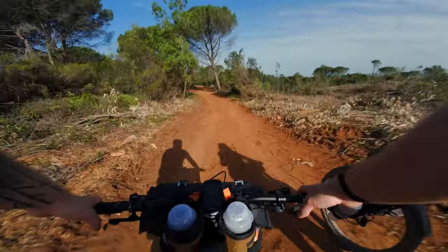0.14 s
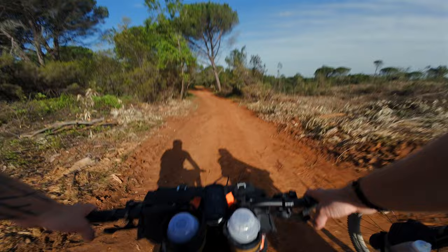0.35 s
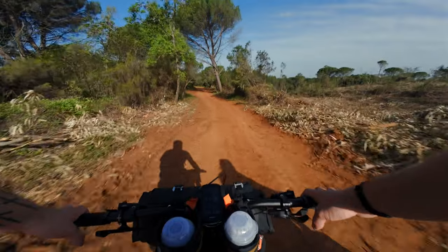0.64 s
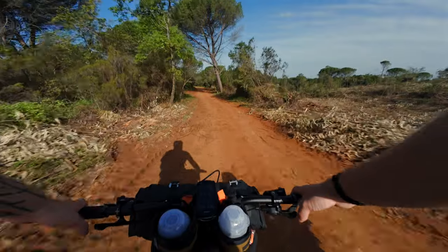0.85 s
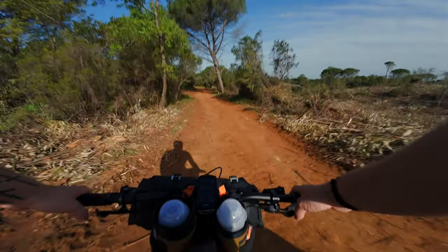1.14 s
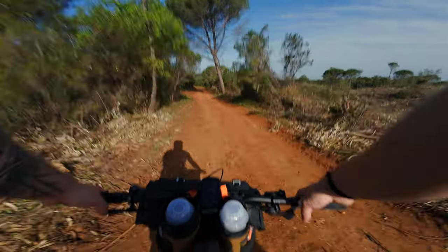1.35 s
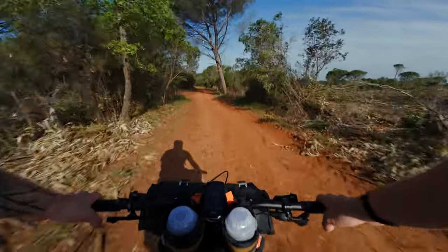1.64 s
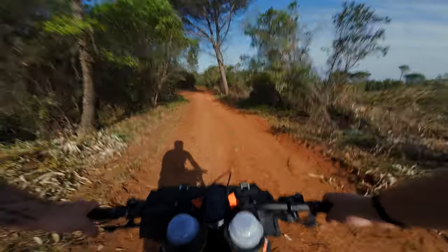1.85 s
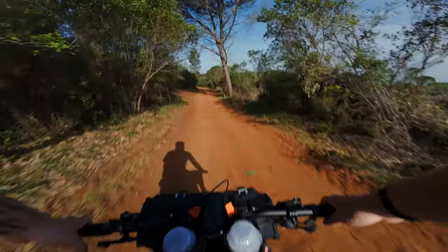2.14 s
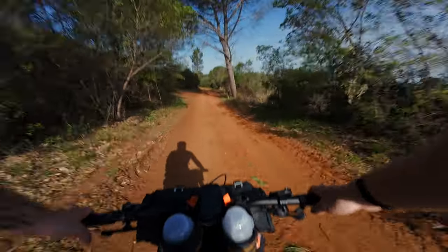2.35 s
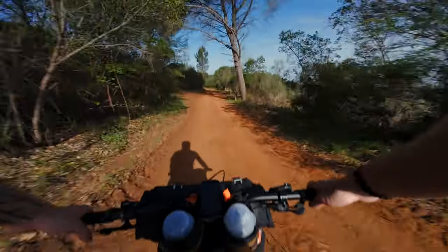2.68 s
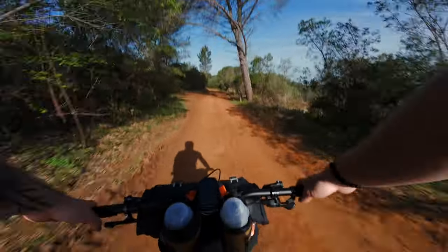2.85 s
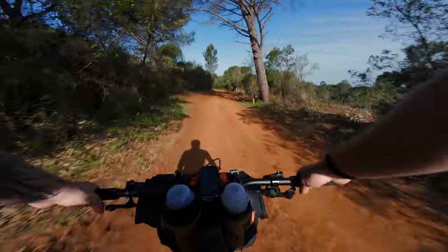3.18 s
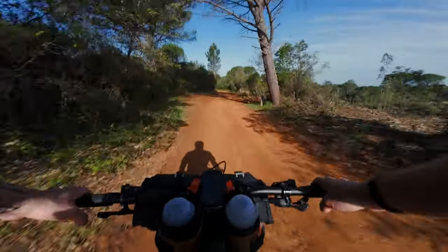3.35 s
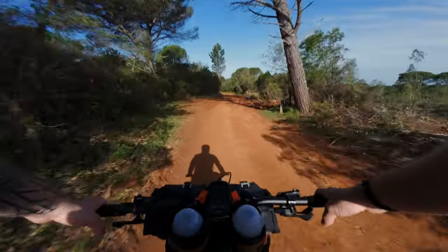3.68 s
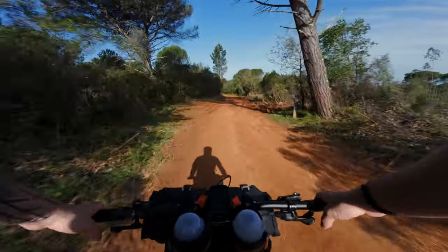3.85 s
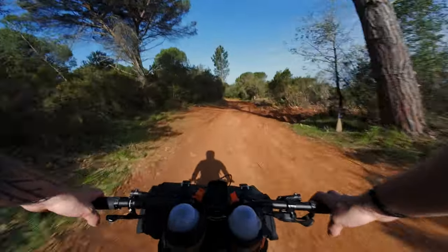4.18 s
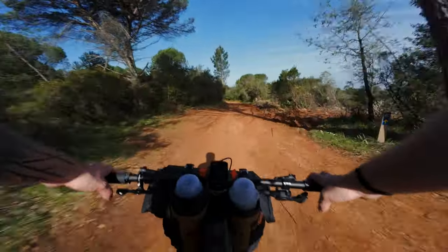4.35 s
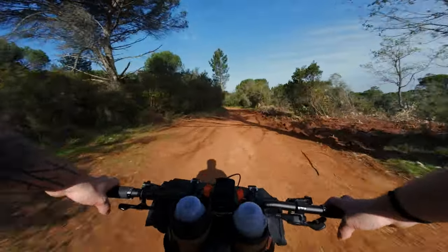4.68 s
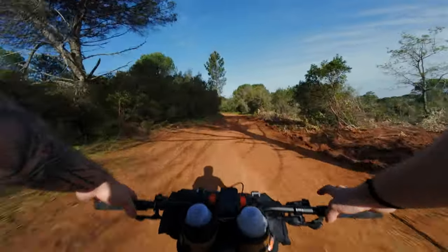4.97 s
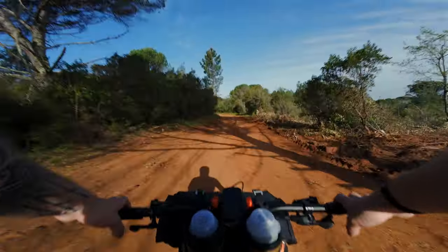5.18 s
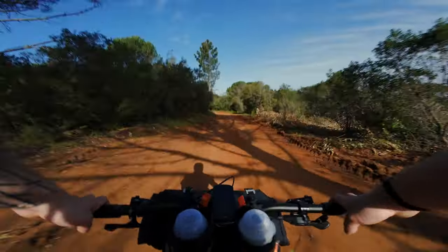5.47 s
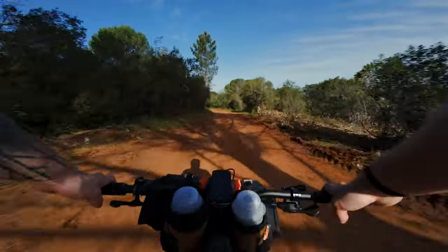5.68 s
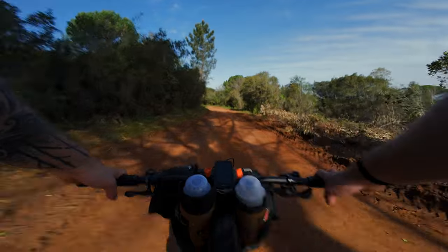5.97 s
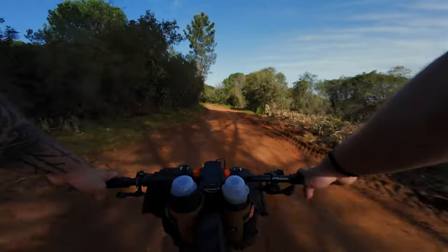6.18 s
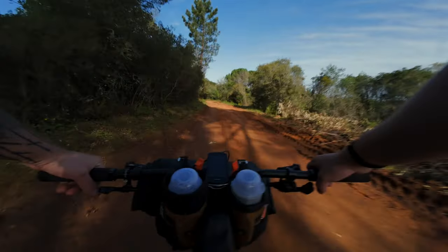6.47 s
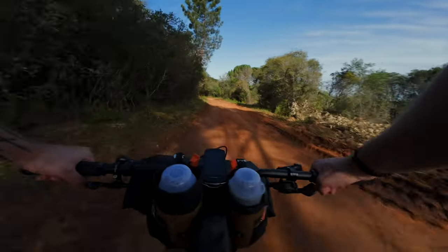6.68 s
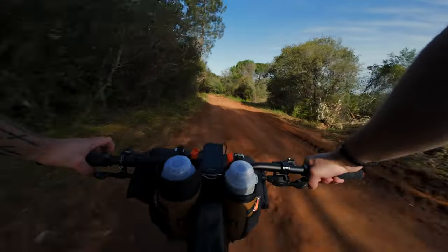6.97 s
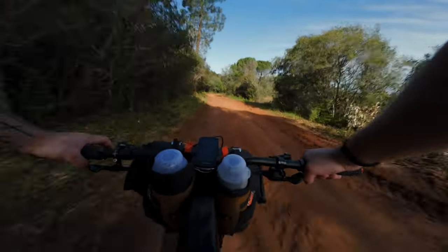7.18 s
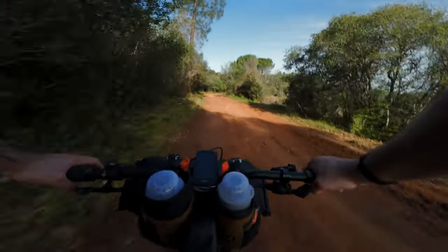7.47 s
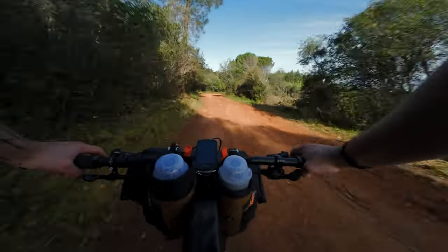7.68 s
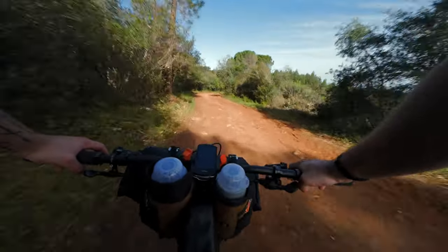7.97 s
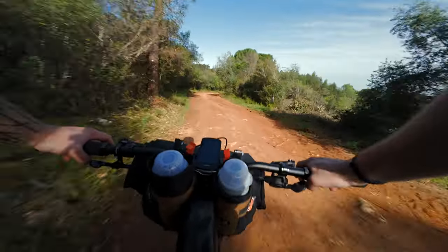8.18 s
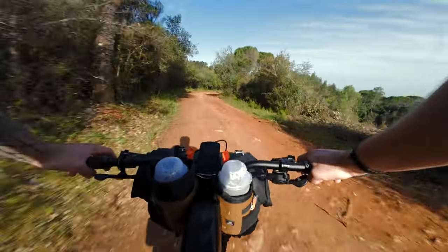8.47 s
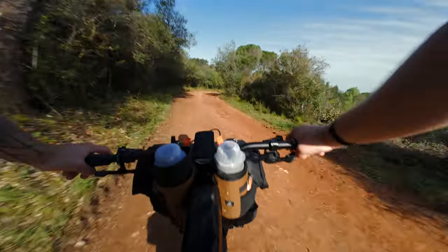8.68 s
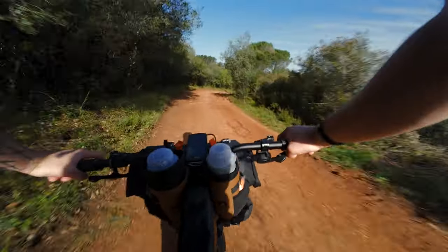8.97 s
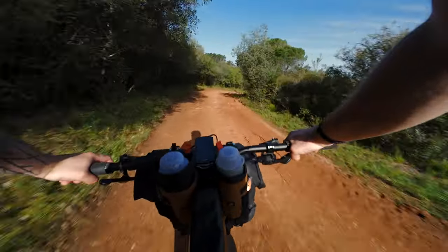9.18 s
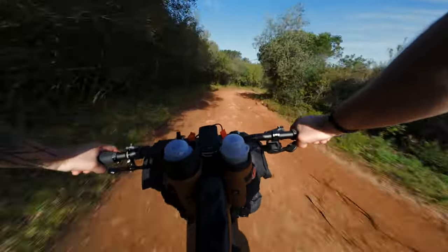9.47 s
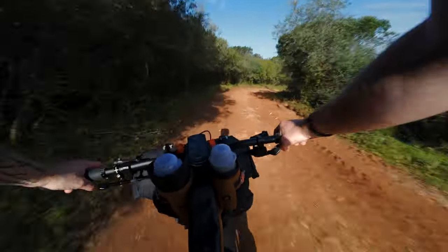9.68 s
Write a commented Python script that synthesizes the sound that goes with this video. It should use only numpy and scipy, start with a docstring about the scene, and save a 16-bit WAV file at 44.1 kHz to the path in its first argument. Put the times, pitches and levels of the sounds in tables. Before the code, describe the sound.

Continuous low drumming of bicycle tyres on an uneven earth track, heard from a chest-worn microphone in open air. Fine sizzle from a passed bicycle soon vanishes. Grit crackles, bags and bottles chatter, stones snap against the frame, and the load slams twice. Airstream flutters and thuds, with thin hiss above. In the second half the tyres scrub with a hollow rush and faint rasp.

```python
"""Loaded bicycle on a rough dirt track

Heard at the rider's chest through two microphone ports. Random impacts drive the resonances of tyres
and frame; streams of small cracks make grit and sand, and a dense rush the tyres scrubbing in a bend.
Damped rings make flung stones, knocks and the slamming load; shaped noise makes rattles and ticks.
Low noise and pressure pulses make the wind, bright noise its hiss; a second bicycle's sizzle fades behind."""
import sys
import numpy as np
from scipy import signal
from scipy.fft import rfft, irfft, next_fast_len
from scipy.io import wavfile
from scipy.ndimage import map_coordinates

SR = 44100
rng = np.random.default_rng(int(sys.argv[2]) if len(sys.argv) > 2 else 0)


def dump(signal):
    """Clip the signal to [-1, 1] and save it as 16-bit WAV at the path in sys.argv[1]."""
    limited = np.clip(np.atleast_2d(signal).T, -1, 1)
    pcm = np.round(limited * 32767).astype(np.int16)
    wavfile.write(sys.argv[1], SR, pcm)


N = 433503

# All levels are relative: a source may add its own trim, and the ports shape the right side.
# rumble of the uneven ground: t/s, level/dB
ROAD_LEVEL = [(0.0, -42), (0.6, -37), (2.96, -36), (3.31, -33.5), (3.7, -35.5), (4.71, -34), (5.15, -38.5),
              (5.5, -33.5), (7.36, -37), (8.1, -34), (8.38, -36), (9.83, -35.5)]
# lowest tyre resonance: t/s, level/dB
LOW_BOOM_LEVEL = [(0, -38), (.55, -34), (1.8, -37.5), (2.35, -33), (2.7, -30.5), (3.0, -36), (3.8, -38.5),
                  (4.15, -34), (4.6, -35), (4.9, -25), (5.1, -37), (5.95, -40), (6.7, -33.5), (7.55, -39.5),
                  (8.0, -30.5), (8.5, -35), (8.7, -35), (8.95, -34), (9.83, -35.5)]
# higher resonances of tyres and frame: t/s, level/dB
FRAME_BOOM_LEVEL = [(0, -38.5), (.7, -32), (1.6, -39), (2.3, -31.5), (3.6, -34), (4.6, -35), (5.0, -42),
                    (5.25, -29.5), (6.1, -33.5), (7.3, -31.5), (8.25, -31), (8.7, -32), (9.83, -32)]
# resonances of tyres and frame: f/Hz, width/Hz, level/dB
TYRE_MODES = [(208.7, 13.4, 0), (291.2, 17.7, 1.5), (334, 43, -17), (416, 16.6, -3.5)]
# shift of these resonances, upward as the bend loads the tyres: t/s, relative rise in pitch/1
TYRE_PITCH = [(0, -0.016), (2.3, -.015), (4.6, 0.0057), (7.3, .02), (9.83, 0.0078)]
# grit crunching under the tyres: t/s, level/dB
GRIT_LEVEL = [(0.0, -49), (0.63, -46), (1.04, -46), (3.09, -46), (3.2, -42), (3.5, -46.5), (4.76, -42.5),
              (5.17, -45.5), (5.72, -40.5), (6.13, -49.5), (6.63, -58), (7.06, -46), (8.27, -45),
              (8.79, -53), (9.42, -46.5), (9.83, -52.5)]
# pitch of the grit: t/s, relative rise/1
GRIT_PITCH = [(0, 0.032), (2.8, 0.00035), (3.25, -.02), (3.8, -0.034), (4.3, 0.063), (4.7, -.05),
              (5.15, .06), (5.8, -0.021), (9.83, 0.022)]
# tyres scrubbing through the bend: t/s, level/dB
SCRUB_LEVEL = [(5.3, -67), (5.8, -42.5), (6.55, -42.5), (7.0, -37), (7.47, -41), (7.82, -38.5), (8.63, -42),
               (9.06, -49), (9.83, -45)]
# thin rasp from the bend on: t/s, level/dB
RASP_LEVEL = [(5.5, -75), (5.9, -47), (6.5, -54), (7.4, -56), (8.4, -49), (9.1, -50.5), (9.83, -51)]

# stones flung at the bicycle: t/s, peak level/dB, ring f/Hz
STONES = [(0.8563, -20, 1840), (.859, -23, 2510), (1.015, -17.5, 2110), (1.566, -21, 1780),
          (2.164, -20, 1620), (2.21, -26, 2060), (2.332, -30, 1100), (2.342, -25, 2000), (3.041, -20, 2190),
          (3.0587, -22, 1690), (3.059, -26, 3400), (3.117, -23, 2020), (3.16, -23, 1800),
          (3.2205, -14.5, 1830), (3.234, -24, 1900), (3.687, -21, 1820), (4.2734, -20, 2272),
          (4.3286, -23, 2200), (5.056, -16, 2510), (5.061, -21, 1098), (5.062, -12, 2120),
          (5.301, -16, 1700), (5.464, -20, 1680), (5.5569, -8, 2220), (5.726, -16, 2230),
          (5.8327, -25, 3144), (5.833, -14.5, 1660), (8.5174, -8.5, 2120), (8.937, -18, 1948),
          (9.5715, -19, 2330)]
# hard knocks that reach the frame: t/s, level/dB, thud f/Hz
KNOCKS = [(1.206, -20.5, 377), (2.333, -17, 450), (3.606, -19, 288), (3.764, -22, 400), (4.743, -24, 408),
          (4.867, -21, 208), (5.821, -18, 730), (5.8335, -16, 500), (5.84, -20, 840), (5.847, -17.5, 420)]
# load slamming against its rack: t/s, contact peak/dB, ring peak/dB, share of the free ring time/1
CLACKS = [(2.2161, -5.5, -18, 0.48), (4.7284, -12, -2.5, 0.9), (4.731, -18, -10, .3)]
# free ringing of rack and load: f/Hz, level/dB, t60/s
RACK_MODES = [(210, -6, 0.06), (297.4, -2.5, 0.049), (410, -5, 0.048), (650, -15, 0.0084), (835, -3, 0.016),
              (1320, 2.5, 0.014), (1680, 0, 0.013)]
# jolts that shake the luggage: t/s, level/dB, t60/s
RATTLES = [(.855, -19.5, 0.056), (1.198, -22, 0.044), (1.565, -19.5, 0.039), (1.783, -26, 0.24),
           (2.163, -19.5, 0.1), (2.321, -19, 0.15), (3.058, -18.5, 0.11), (3.14, -20, .1),
           (3.158, -19, 0.18), (3.21, -30, 1.0), (3.3, -31.5, 0.47), (3.601, -16, 0.077),
           (3.759, -18.5, 0.23), (4.271, -28, 0.89), (4.733, -23.5, 0.23), (5.296, -24, 0.066),
           (5.625, -21, 0.066), (5.82, -23, 0.11), (5.843, -24, 0.063), (6.058, -26, 0.066),
           (8.842, -20.5, 0.036), (8.975, -21, 0.05), (9.024, -19.5, 0.045), (9.222, -23, .05)]
# sharp metal ticks of chain and buckles: t/s, level/dB
TICKS = [(.174, -17.5), (3.161, -24), (3.2166, -18), (3.5637, -20.5), (5.5363, -23), (5.777, -20.5),
         (5.994, -18.5), (7.093, -18)]

# low buffeting of the airstream: t/s, level/dB
WIND_LEVEL = [(0.0, -33), (0.35, -32), (1.23, -30.5), (2.1, -28.5), (2.5, -28.5), (3.3, -28.5), (4.76, -35),
              (5.5, -25.5), (5.7, -23.5), (6.07, -28), (7.42, -28), (7.66, -31), (8.16, -22.5),
              (8.45, -26.5), (8.7, -27), (9.0, -27), (9.83, -27.5)]
# separate puffs of wind: t/s, level over the steady buffeting/dB
GUSTS = [(.2, 10), (.42, 11), (.71, 8), (1.47, 10), (2.12, 7), (2.27, 7.5), (4.0, 4.5), (4.28, 6),
         (6.53, 5.5), (7.31, 8), (7.46, 4), (8.99, 1.5), (9.63, 4)]
# eddies thumping on the microphone: t/s, peak level/dB, rise time constant/s
EDDIES = [(.386, -10.5, .0015), (1.402, -9, 0.0013), (1.494, -9, 0.0012), (1.565, -12, .0015),
          (1.889, -8.5, 0.00052), (1.966, -7.5, 0.00053), (2.072, -8, 0.0005), (2.148, -7.5, .0007),
          (2.241, -7, 0.0012), (2.304, -9, 0.00047), (2.379, -10, 0.0016), (2.448, -12.5, 0.00039),
          (2.526, -7, .0012), (2.606, -8, 0.00057), (2.694, -11, .0012), (2.761, -8, 0.00044),
          (2.837, -12, 0.0021), (2.914, -11, 0.00037), (3.081, -11, .0008), (3.16, -8.5, 0.0029),
          (3.263, -10, 0.0013), (3.358, -10, 0.0015), (3.426, -10.5, .0006), (3.525, -13, 0.002),
          (5.64, -14, .003), (5.751, -10, 0.0037), (6.864, -8.5, 0.0021), (6.94, -13, 0.002),
          (7.926, -10, 0.0043), (8.02, -11, 0.003), (8.157, -11, .004), (8.205, -6, .004),
          (8.354, -4, 0.0031)]
# hiss of the airstream: t/s, level/dB
HISS_LEVEL = [(0.0, -43), (0.76, -50.5), (2.16, -50.5), (3.34, -50), (5.2, -52.5), (5.91, -44.5),
              (6.21, -50), (6.79, -47), (7.06, -45.5), (7.56, -47.5), (8.16, -45.5), (8.65, -46),
              (8.84, -50.5), (9.83, -47.5)]

# spectrum of the road rumble: f/Hz, level per Hz/dB
ROAD_COLOUR = [(50, -5), (130, -4.5), (180, 0.5), (240, -0.5), (330, 1.5), (450, 0), (550, -2.5),
               (640, -10), (850, -10), (1300, -27), (2000, -17), (4000, -33)]
# spectrum of the grit: f/Hz, level per Hz/dB
GRIT_COLOUR = [(400, -10), (800, -4.5), (1120, 1.5), (1350, -5.5), (1750, 2), (2300, -2), (2750, -2.5),
               (3200, -13.5), (4000, -19), (6000, -50)]
# spectrum of the finer grains: f/Hz, level per Hz/dB
SAND_COLOUR = [(1500, -31), (2900, -2.5), (3600, -1), (4100, -6.5), (4900, 1.5), (5600, -17), (7000, -25),
               (15000, -36)]
# spectrum of the scrub: f/Hz, level per Hz/dB
SCRUB_COLOUR = [(400, -46), (700, -1.5), (1000, 3.5), (1190, 0.5), (1390, 7.5), (1650, 1), (2050, 5.5),
                (2500, -6.5), (3200, -14), (4300, -21), (8000, -37)]
# spectrum of the rasp: f/Hz, level per Hz/dB
RASP_COLOUR = [(2000, -23), (3100, -10), (3700, 7), (4050, -6), (4400, -32), (8000, -35)]
# spectrum of the shaken luggage: f/Hz, level per Hz/dB
RATTLE_COLOUR = [(150, 4), (400, 15), (1200, 1), (1900, 8.5), (3000, -3.5), (4000, -3.5), (5500, -11.5),
                 (9000, -19), (15000, -42)]
# spectrum of the metal ticks: f/Hz, level per Hz/dB
TICK_COLOUR = [(1500, -16), (4000, -4.5), (7000, -10.5), (9500, -4.5), (11700, 1.5), (13500, -14),
               (16000, -10.5)]
# spectrum of the buffeting: f/Hz, level per Hz/dB
WIND_COLOUR = [(14, -3), (27, 2), (50, -6), (70, -7), (100, -17.5), (150, -20), (300, -33.5), (800, -57.5)]
# spectrum of the air hiss: f/Hz, level per Hz/dB
AIR_COLOUR = [(3000, -5.5), (5000, -10), (6800, -14), (8300, -6), (9000, -5.5), (10200, 4), (10900, -3.5),
              (12400, -1), (13000, -2), (13800, -7), (15600, -8)]
# spectrum of the second bicycle: f/Hz, level per Hz/dB
COMPANION_COLOUR = [(500, 4.5), (2500, 3), (3300, 0.5), (5000, -1), (6800, -9), (7600, -5), (8200, 3),
                    (9000, -5), (10000, -4), (12000, -3), (13000, -3), (15500, -11)]

# likeness of diffuse sound at the two ports: f/Hz, correlation/1
ALIKE = [(1400, 1), (3000, 0.71), (5000, 0.62), (9000, 0.11), (15000, .1)]
# response of the right port: f/Hz, level/dB
RIGHT_PORT = [(1150, 0), (1700, 2), (2400, 3), (3400, 3.5), (5000, 0.5), (6900, -10), (8500, -12),
              (10200, -19.5), (11800, -33), (15000, -22)]
# phase by which the left port leads: f/Hz, phase/rad
LEAD = [(30, 0.0008), (130, 0.0027), (300, 0.0037), (600, 0.012), (1200, 0.033), (2150, 0.6), (3400, 1.13),
        (4300, 2.4), (7700, 4.2), (15000, 6.7)]


def amp(db):
    """Level definition: twenty decibels are a factor of ten in amplitude."""
    return 10 ** (np.asarray(db) / 20)


def unit(x):
    """Power normalisation: the signal is scaled to rms 1."""
    return x / np.sqrt(np.mean(x ** 2) + 1e-20)


def along(points, hz):
    """Logarithmic pitch scale: (f, value) points are interpolated over log frequency."""
    f, v = np.transpose(points)
    return np.interp(np.log(hz + 1), np.log(f + 1), v)


def curves(rows):
    """Linear interpolation in time: one value per sample for each column after t."""
    s, *cols = np.transpose(rows)
    return [np.interp(np.arange(N) / SR, s, c) for c in cols]


def wobble(rate):
    """Slow random modulation: a smooth curve through normal knots, rate of them a second."""
    knots = rng.standard_normal(int(N * rate / SR) + 4)
    return map_coordinates(knots, [np.arange(N) * rate / SR])


def filtered(x, response):
    """Linear filtering: the spectrum is multiplied by a complex response of frequency."""
    m = next_fast_len(N + 8192)
    return irfft(rfft(x, m) * response(np.fft.rfftfreq(m, 1 / SR)), m)[..., :N]


def coloured(x, spectrum):
    """Spectral shaping at constant power: white noise keeps its power."""
    return filtered(x, lambda hz: unit(amp(along(spectrum, hz))))


def spread(pair):
    """Partial coherence: unrelated signals become left and right, alike at low frequencies only."""
    def shares(hz):
        turn = np.arccos(np.clip(along(ALIKE, hz), -1, 1)) / 2
        return np.array([np.cos(turn), np.sin(turn)])
    mid, side = filtered(pair, shares)
    return np.array([mid + side, mid - side])


def grains(rate, scatter_db):
    """Random impact process: two streams of tiny impacts of uneven size and sign, jointly rms 1."""
    struck = rng.random((2, N)) < rate / SR
    size = amp(scatter_db * np.clip(rng.standard_normal((2, N)), -2, 2))
    return unit(struck * size * rng.choice([-1, 1], (2, N)))


def add(track, s, sound):
    """Superposition: a short sound is added to a track from time s."""
    start = max(round(s * SR), 0)
    part = track[..., start:start + sound.shape[-1]]
    part += sound[..., :part.shape[-1]]


def drumming(boom_db=0.5, frame_db=-2, road_db=4.0, bump_db=1.5, sway_db=0.7, waver=.015):
    """Forced resonance: ground impacts drive tyres and frame, whose modes swell and shift with the load."""
    (level_db,), (stretch,) = curves(ROAD_LEVEL), curves(TYRE_PITCH)
    (tyre_db,), (shake_db,) = curves(LOW_BOOM_LEVEL), curves(FRAME_BOOM_LEVEL)
    bumps = amp(bump_db * wobble(30))
    booms = []
    for hz, width, db in TYRE_MODES:
        impacts = bumps * grains(rate=300, scatter_db=2.0)[0]
        ring = filtered(impacts, lambda f: 1j * f * width / (hz * hz - f * f + 1j * f * width))
        clock = np.cumsum(1 + stretch + waver * wobble(5))  # reading faster raises the pitch
        shifted = map_coordinates(ring, [clock], order=1, mode="mirror")
        booms.append(amp(db + sway_db * wobble(7)) * shifted)
    low_boom = amp(tyre_db + boom_db) * unit(booms[0])
    frame_boom = amp(shake_db + frame_db) * unit(sum(booms[1:]))
    rumble = coloured(grains(rate=900, scatter_db=1.5)[0], ROAD_COLOUR)
    return low_boom + frame_boom + amp(level_db + road_db) * bumps * rumble


def crunch(level_db, grit_db=4.5, sand_db=-7, clump_db=2.5, sweep_db=1.2, waver=.03):
    """Granular fracture: grit and sand crack in quick clumps within patches, the grit shifting in pitch."""
    stretch, = curves(GRIT_PITCH)
    clock = np.cumsum(1 + stretch + waver * wobble(11))
    cracks = coloured(grains(rate=850, scatter_db=2.0), GRIT_COLOUR)
    grit = np.array([map_coordinates(stream, [clock], order=3, mode="mirror") for stream in cracks])
    sand = coloured(grains(rate=1200, scatter_db=4.0), SAND_COLOUR)
    patches = amp(level_db + sweep_db * wobble(16))
    grit_gain = amp(grit_db + clump_db * wobble(90))
    sand_gain = amp(sand_db + clump_db * wobble(90))
    return patches * (grit_gain * grit + sand_gain * sand)


def scrub(scrub_db=5.5, flutter_db=1.8, onset_s=0.27, slip_s=7.27, slip_gain_db=4.5, slip_width_s=0.035):
    """Sliding friction: in the bend the tread slides a little, with one harder slip, in a hollow rush."""
    level_db, = curves(SCRUB_LEVEL)
    t = np.arange(N) / SR
    turning = np.clip((t - SCRUB_LEVEL[0][0]) / onset_s, 0, 1)
    slip_db = slip_gain_db * np.exp(-((t - slip_s) / slip_width_s) ** 2 / 2)
    rush = coloured(grains(rate=3000, scatter_db=3.0)[0], SCRUB_COLOUR)
    return turning * amp(level_db + slip_db + scrub_db + flutter_db * wobble(18)) * rush


def rasp(flutter_db=2.5):
    """Band-shaped random impacts: a thin, fine rasp sets in at the bend and stays."""
    level_db, = curves(RASP_LEVEL)
    scrape = coloured(grains(rate=2500, scatter_db=2.5), RASP_COLOUR)
    return amp(level_db + flutter_db * wobble(25)) * scrape


def ping(hz, t60, attack=0.00016, crack=0.26, crack_t60=0.0089, reach=1.41):
    """Damped impact response: one ring and a short dull crack, with little above the ring; peak 1."""
    t = np.arange(SR // 20) / SR
    ring = np.sin(2 * np.pi * hz * t) * amp(-60 * t / t60)
    band = signal.butter(3, [0.42 * hz, min(1.4 * hz, SR / 4)], "band", fs=SR, output="sos")
    snap = unit(signal.sosfilt(band, rng.standard_normal(len(t)))) * amp(-60 * t / crack_t60)
    contact = signal.butter(4, min(reach * hz, SR / 4), fs=SR, output="sos")
    blow = signal.sosfilt(contact, (ring + crack * snap) * (1 - np.exp(-t / attack)))
    return blow / np.abs(blow).max()


def stones(grit_db, pebble_db=12, scatter_db=0.5, pebble_hz=2100, pebble_t60=0.018, count=260):
    """Impact excitation: a few stones strike hard; many pebbles pop as loudly as the grit is coarse."""
    out = np.zeros(N)
    for s, db, hz in STONES:
        t60 = 0.0089 * hz / 2200  # s; lower blows are deader in proportion
        add(out, s, amp(db) * ping(hz, t60))
    moments = rng.integers(N, size=count)
    scatter = np.clip(rng.standard_normal((count, 2)), -2, 2)
    for at, (size, pitch) in zip(moments, scatter):
        pop = ping(pebble_hz * np.exp(.17 * pitch), pebble_t60)
        add(out, at / SR, amp(grit_db[at] + pebble_db + scatter_db * size) * pop)
    return out


def knocks(t60=0.013, overtone=2.46, overtone_db=-3, ring_db=-1, reach_hz=50):
    """Modal excitation: a blow thuds with one overtone and rings the tyre and frame modes near its pitch."""
    out, t = np.zeros(N), np.arange(SR // 4) / SR
    for s, db, thud_hz in KNOCKS:
        phase = 2 * np.pi * thud_hz * t
        thud = amp(-60 * t / t60) * (np.sin(phase) - amp(overtone_db) * np.sin(overtone * phase))
        ring = np.zeros(len(t))
        for hz, width, mode_db in TYRE_MODES:
            nearness = 1 / (1 + ((hz - thud_hz) / reach_hz) ** 2)
            ring += amp(mode_db) * nearness * np.exp(-np.pi * width * t) * np.sin(2 * np.pi * hz * t)
        add(out, s, amp(db) * (thud + amp(ring_db) * ring))
    return out


def clacks(low_hz=380, contact_hz=2050, build_cycles=0.4):
    """Contact damping: the load slams its rack; the hollow ring is choked while the parts stay pressed."""
    out, t = np.zeros(N), np.arange(SR // 8) / SR
    soften = signal.butter(10, min(contact_hz, SR / 4), fs=SR, output="sos")
    high_pass = signal.butter(2, low_hz, "high", fs=SR, output="sos")
    push = signal.sosfilt(high_pass, signal.unit_impulse(len(t)))
    for s, contact_db, ring_db, free in CLACKS:
        ring = np.zeros(len(t))
        for hz, mode_db, t60 in RACK_MODES:
            build = 1 - np.exp(-hz * t / (build_cycles * free))
            ring += amp(mode_db - 60 * t / (t60 * free)) * build * np.sin(2 * np.pi * hz * t)
        for db, part in (contact_db, push), (ring_db, ring):
            part = signal.sosfilt(soften, part)
            add(out, s, amp(db) * part / np.abs(part).max())
    return out


def rattles(rattle_db=-6, rise=0.0026, lead=.02):
    """Repeated loose contact: jolts set bags, bottles and cables chattering; it builds fast and dies."""
    shake, t = np.zeros(N), np.arange(-lead, .2, 1 / SR)
    build = np.exp(np.minimum(t, 0) / rise)
    for s, db, t60 in RATTLES:
        envelope = np.minimum(build, amp(-60 * t / t60))
        add(shake, s + rise - lead, amp(db + rattle_db) * envelope)
    return coloured(shake * grains(rate=4000, scatter_db=0.5), RATTLE_COLOUR)


def ticks(tick_db=-4.5, t60=0.022):
    """Brief contact: small metal parts touch in a bright, dry burst of decaying noise."""
    touch, t = np.zeros(N), np.arange(SR // 20) / SR
    for s, db in TICKS:
        add(touch, s, amp(db + tick_db - 60 * t / t60))
    return coloured(touch * rng.standard_normal((2, N)), TICK_COLOUR)


def buffeting(buffet_db=5.0, lump_db=2.0, puff_width_s=0.041):
    """Turbulent pressure fluctuation: lumpy low noise swells briefly with each puff of wind."""
    level_db, = curves(WIND_LEVEL)
    t = np.arange(N) / SR
    puffs_db = sum(db * np.exp(-((t - s) / puff_width_s) ** 2 / 2) for s, db in GUSTS)
    lumps = unit(amp(lump_db * wobble(14)) * coloured(rng.standard_normal(N), WIND_COLOUR))
    return amp(level_db + puffs_db + buffet_db) * lumps


def eddies(fall=0.0074, suction_width=0.013, suction_lead=0.0048, lead=.1):
    """Vortex pressure pulse: a suction builds, then a steep-fronted peak of equal area thumps."""
    out, t = np.zeros(N), np.arange(-lead, lead, 1 / SR)
    suction = np.exp(-((t + suction_lead) / suction_width) ** 2 / 2)
    for s, db, rise in EDDIES:
        peak = np.exp(-np.logaddexp(-t / rise, t / fall))
        push = peak - suction * peak.sum() / suction.sum()
        add(out, s - lead, amp(db) * push / push.max())
    return out


def air(hiss_db=7, flutter_db=1.0):
    """Broadband flow noise: the airstream hisses over the ports."""
    level_db, = curves(HISS_LEVEL)
    hiss = coloured(rng.standard_normal((2, N)), AIR_COLOUR)
    return amp(level_db + hiss_db + flutter_db * wobble(36)) * hiss


def companion(start_db=-32.5, fade_db_per_s=13.5):
    """Attenuation with growing distance: the second bicycle's fine sizzle fades as it drops behind."""
    level_db = start_db - fade_db_per_s * np.arange(N) / SR
    return amp(level_db) * coloured(grains(rate=6000, scatter_db=5.0), COMPANION_COLOUR)


def ports(pair, matched_hz=800):
    """Receiver response: ports match in the bass; the right favours the middle, its treble muffled and late."""
    colour = [(matched_hz, 0), *RIGHT_PORT]
    right = filtered(pair[1], lambda hz: amp(along(colour, hz)) * np.exp(-1j * along(LEAD, hz)))
    return np.array([pair[0], right])


def scene():
    """Diffuse and direct fields: textures, rattles and ticks spread, the rest is direct; scrub is dead centre."""
    grit_db, = curves(GRIT_LEVEL)
    sliding = scrub()
    direct = drumming() + stones(grit_db) + knocks() + clacks() + buffeting() + eddies()
    diffuse = crunch(grit_db) + rasp() + rattles() + ticks() + air() + companion()
    return ports(spread(diffuse) + direct) + sliding


def record(dry, low_cut_hz=13, top_hz=15850):
    """Band limitation: the slowest pressure drift is blocked and nothing passes above the top limit."""
    low_cut = signal.butter(2, low_cut_hz, "high", fs=SR, output="sos")
    return filtered(signal.sosfiltfilt(low_cut, dry), lambda hz: hz < top_hz)


dry = scene()
out = record(dry)
dump(out)
```